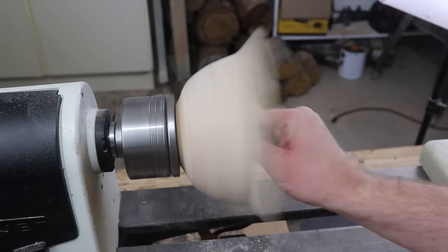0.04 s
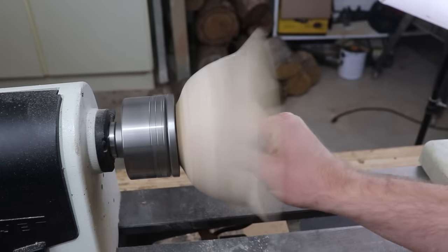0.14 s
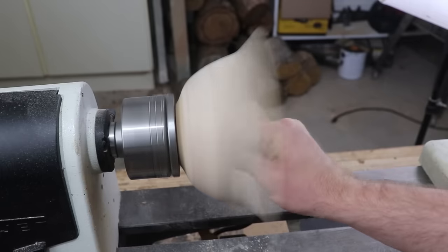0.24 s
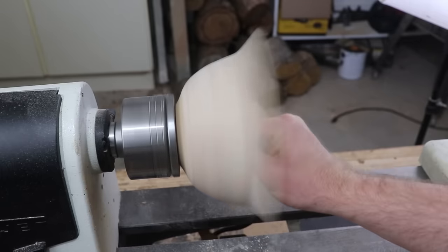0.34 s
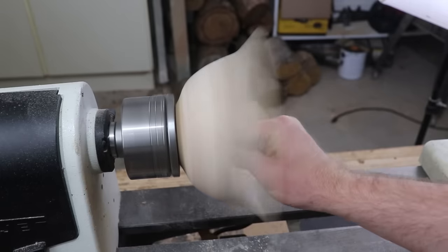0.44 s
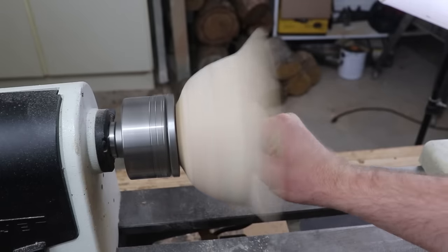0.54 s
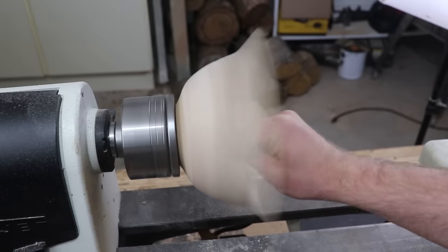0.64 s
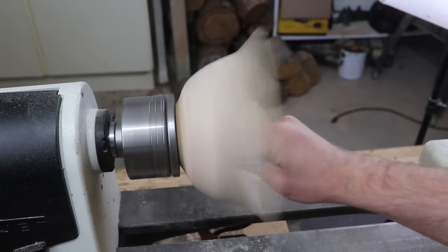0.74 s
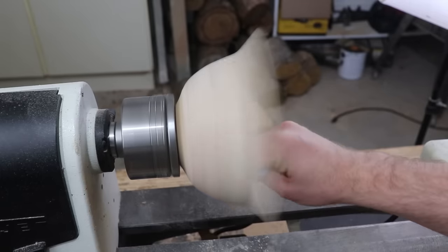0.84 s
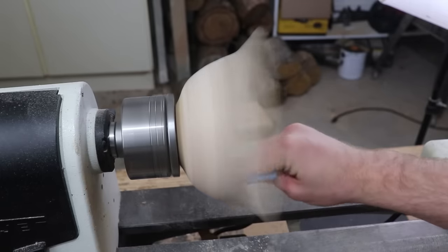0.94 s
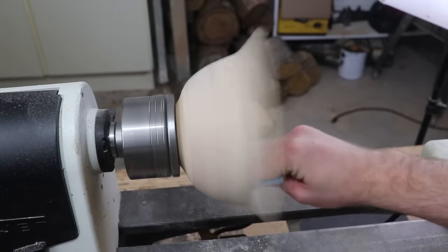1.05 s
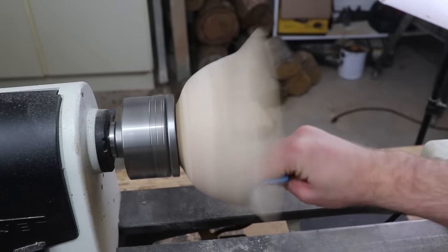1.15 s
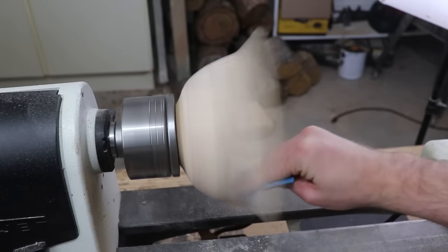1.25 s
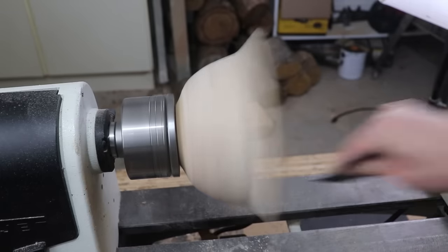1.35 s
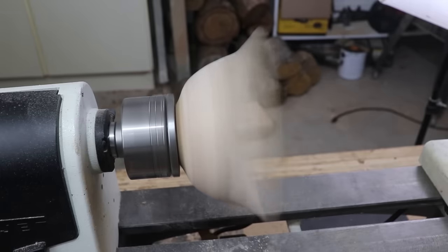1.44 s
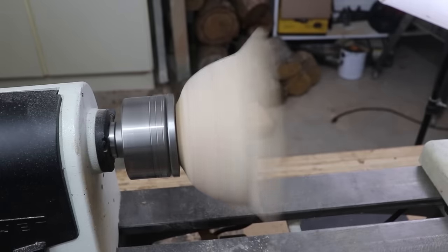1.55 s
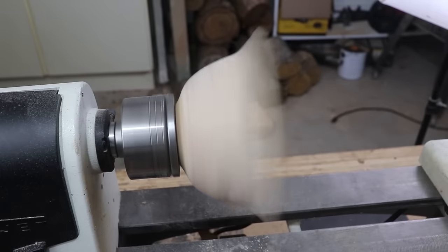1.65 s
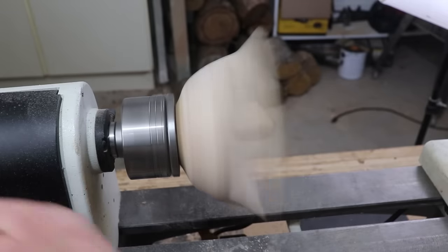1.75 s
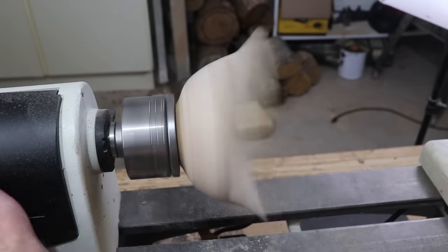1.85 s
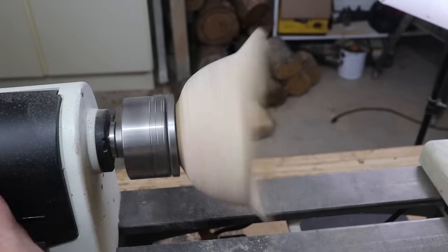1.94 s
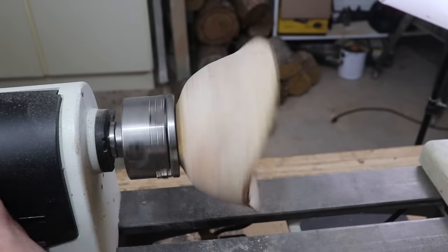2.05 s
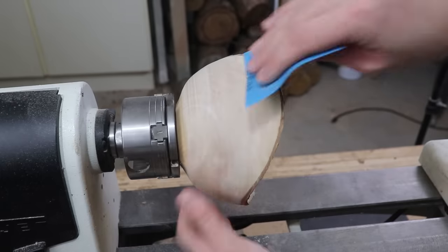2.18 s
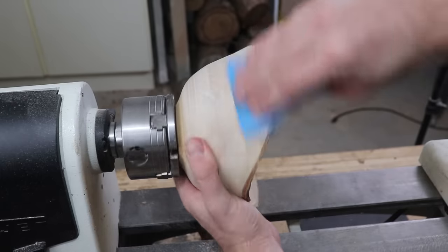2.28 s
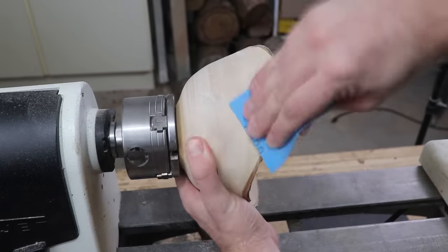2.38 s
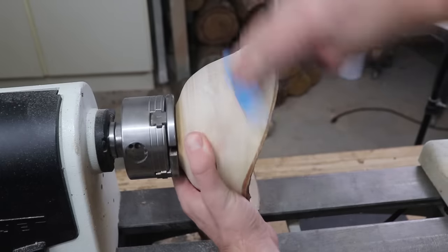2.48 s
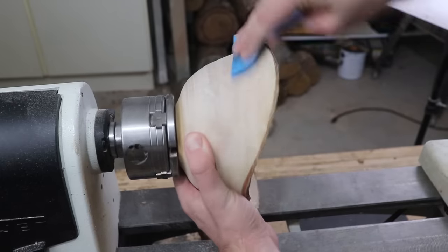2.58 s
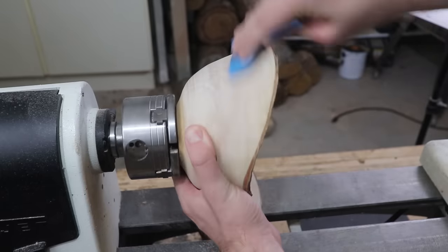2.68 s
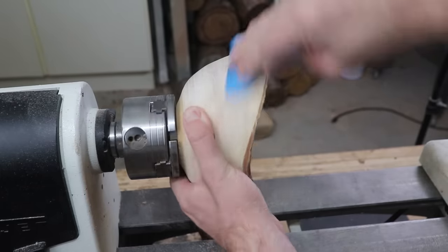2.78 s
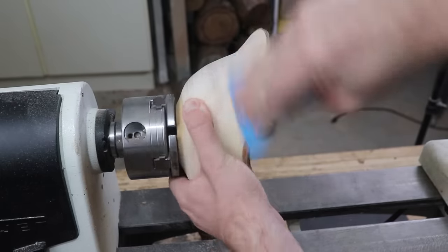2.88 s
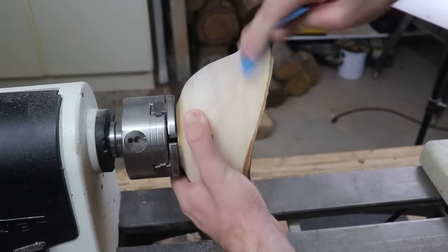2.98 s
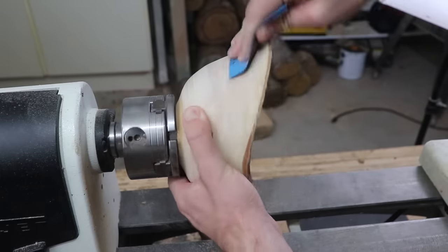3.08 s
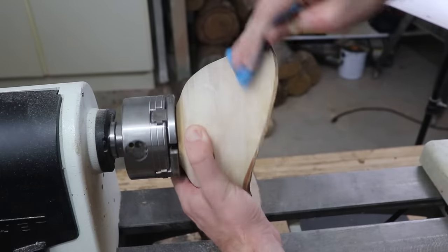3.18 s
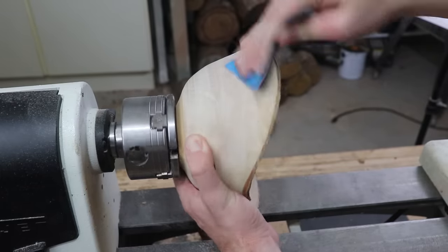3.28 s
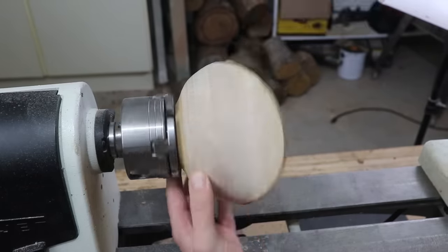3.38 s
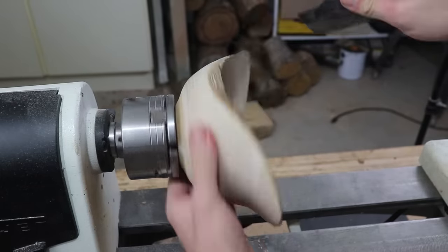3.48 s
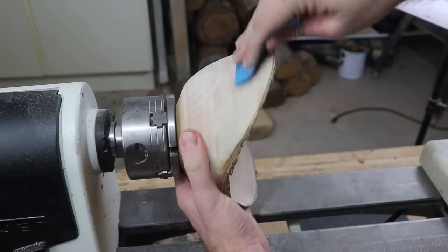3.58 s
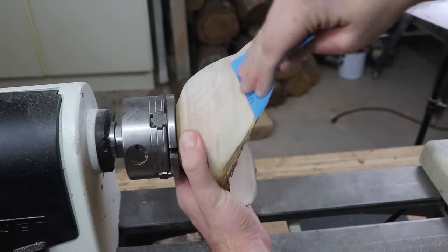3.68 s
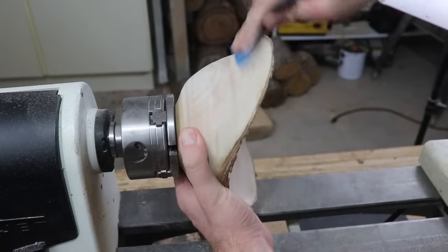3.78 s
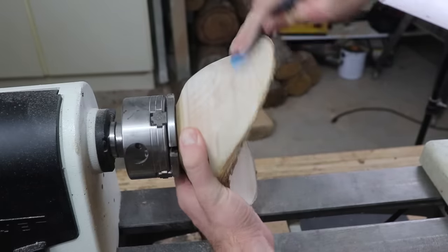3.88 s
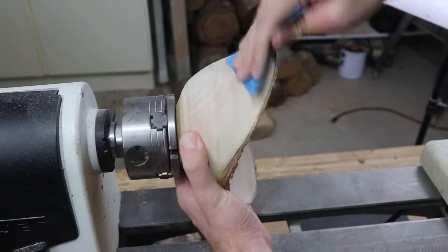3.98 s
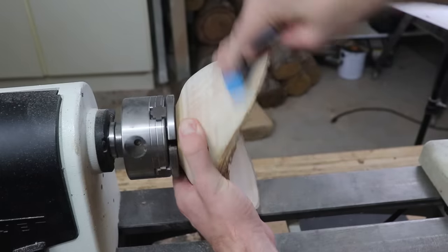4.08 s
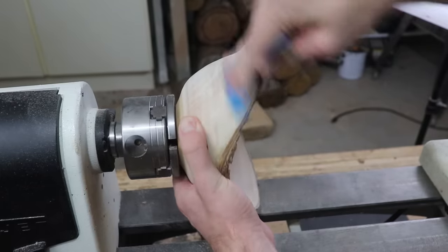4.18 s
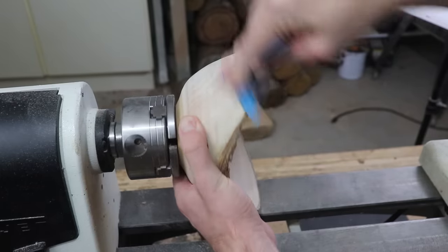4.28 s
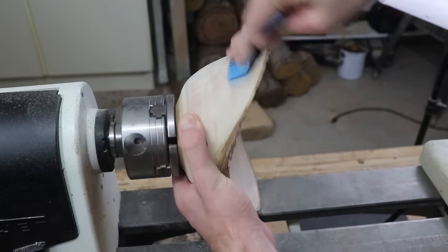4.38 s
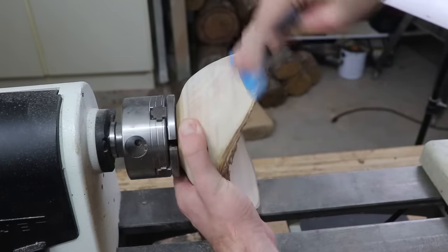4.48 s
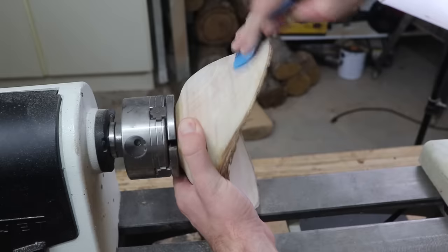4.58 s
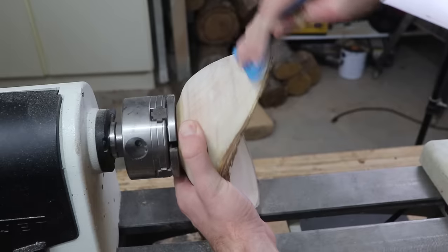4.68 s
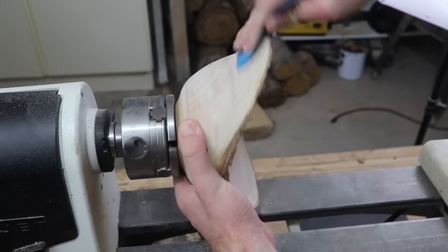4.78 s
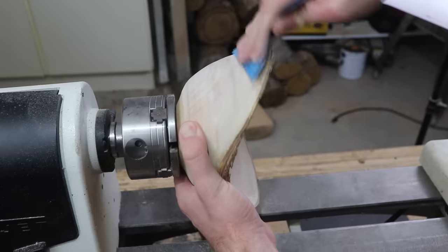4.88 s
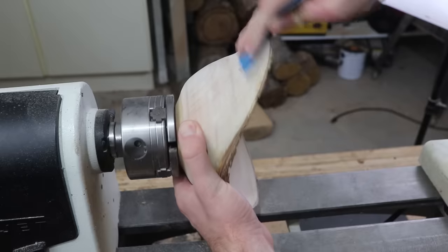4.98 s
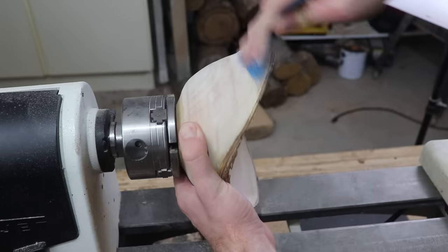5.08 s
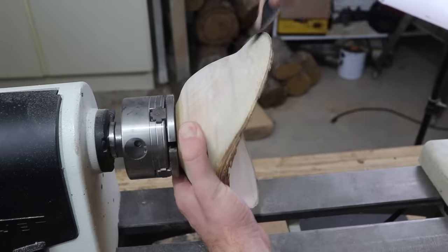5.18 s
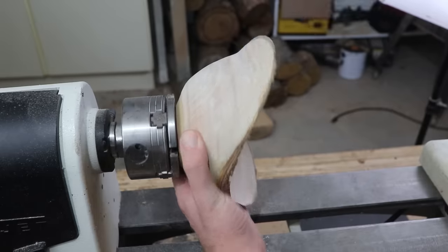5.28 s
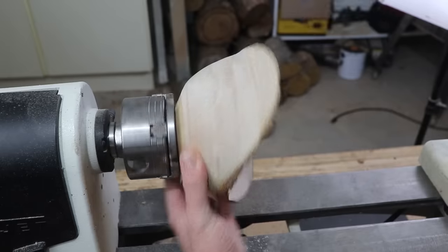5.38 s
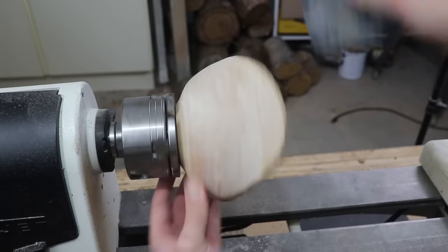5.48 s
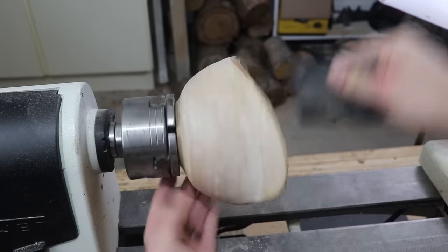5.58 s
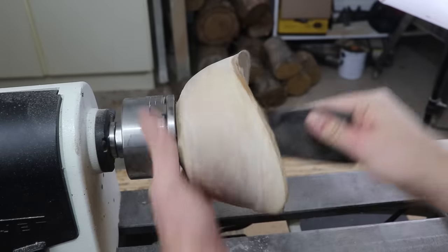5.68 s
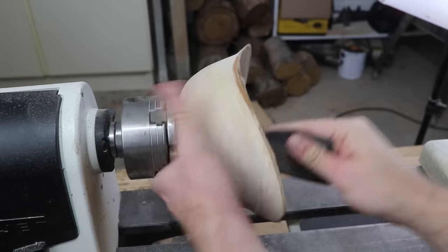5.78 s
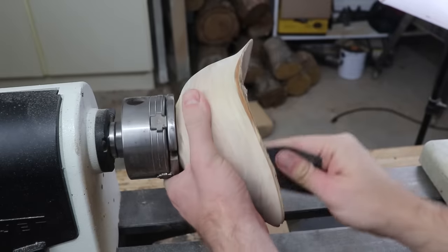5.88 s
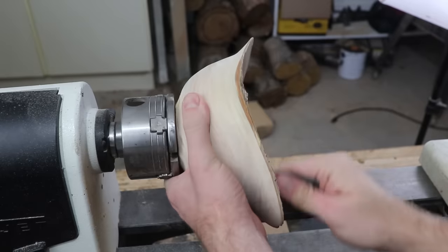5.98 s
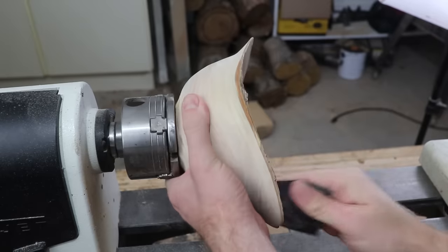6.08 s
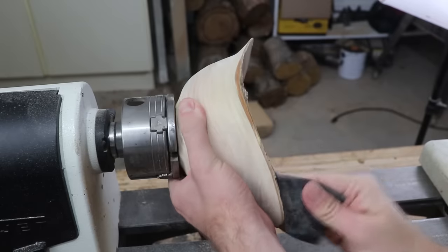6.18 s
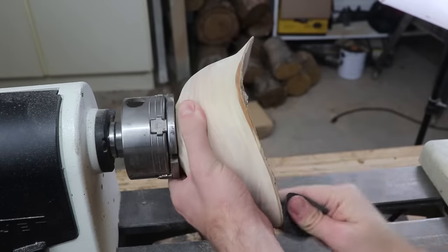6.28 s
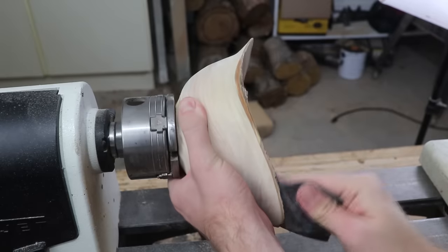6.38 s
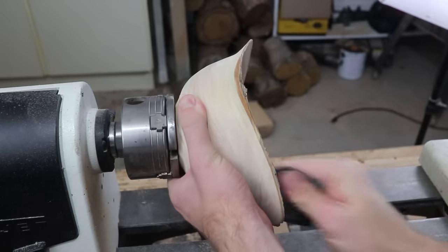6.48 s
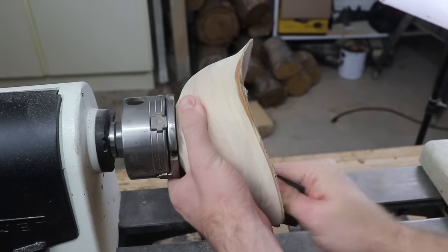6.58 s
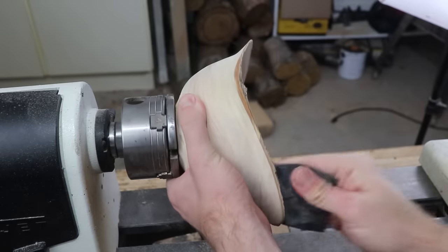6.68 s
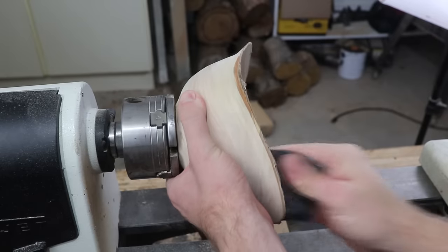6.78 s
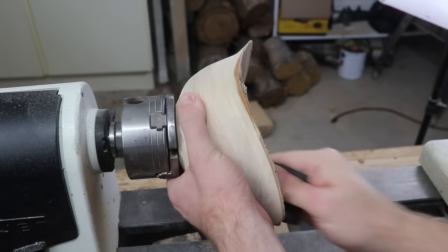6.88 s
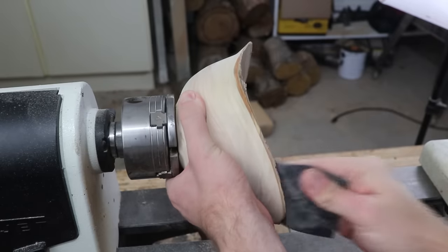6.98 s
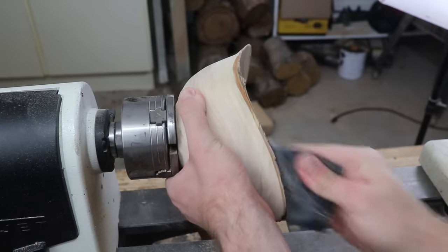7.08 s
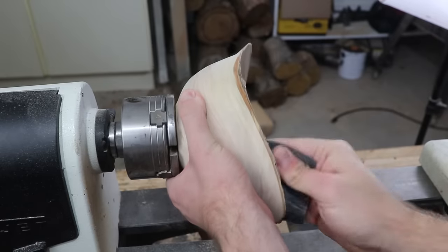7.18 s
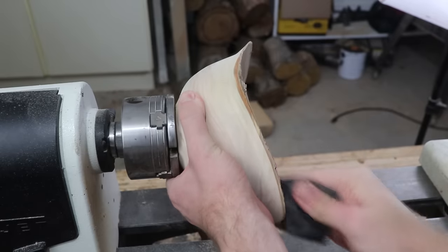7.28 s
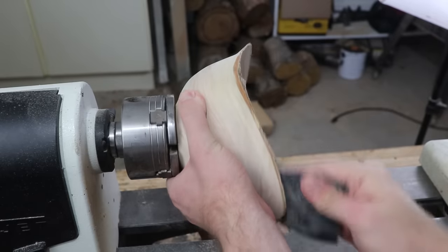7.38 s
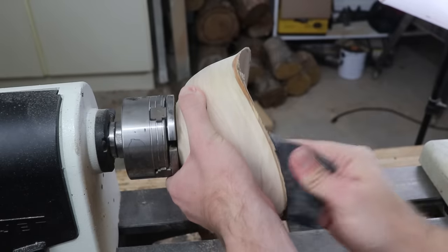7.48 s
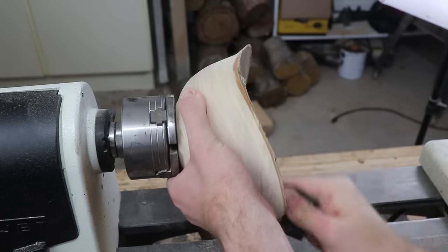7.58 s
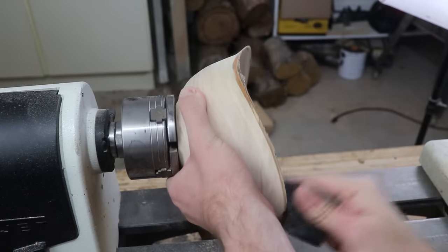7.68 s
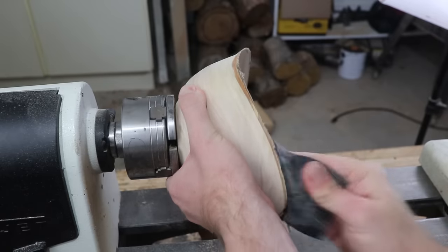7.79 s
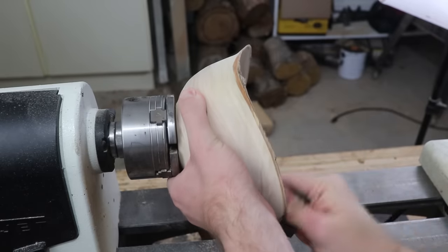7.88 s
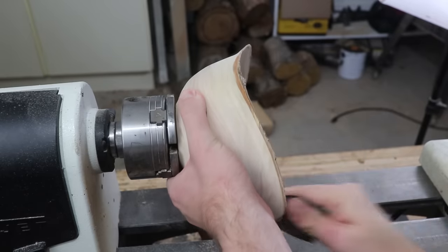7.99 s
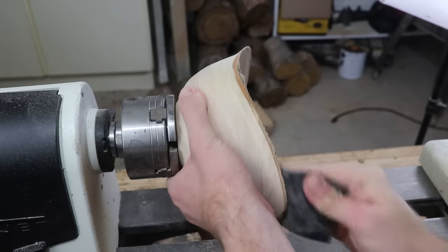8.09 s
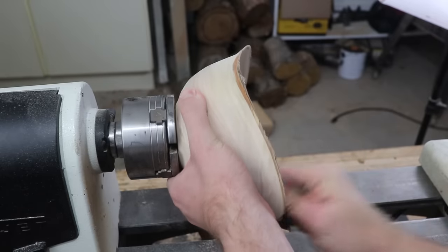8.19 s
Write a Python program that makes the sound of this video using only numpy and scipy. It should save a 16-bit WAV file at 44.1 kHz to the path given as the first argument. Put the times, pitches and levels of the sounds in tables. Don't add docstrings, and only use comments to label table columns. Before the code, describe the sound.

Lathe hum and steady gritty fizz stop with a click and short whirring rundown, followed by rapid, then longer sandpaper rasps on hollow wood.

```python
import sys
import numpy as np
from scipy import signal
from scipy.fft import rfft, irfft
from scipy.io import wavfile
from scipy.ndimage import uniform_filter1d

SR = 44100
rng = np.random.default_rng(int(sys.argv[2]) if len(sys.argv) > 2 else 0)


def voltage_ratio(level):
    return 10 ** (np.asarray(level, float) / 20)


def master_out(mix):
    frames = np.transpose(np.atleast_2d(mix))
    ceiling = np.clip(frames, -1, 1)
    pcm = np.round(ceiling * 32767).astype(np.int16)
    wavfile.write(sys.argv[1], SR, pcm)


N = 363815

# f/Hz, level/dB
FLOOR = [(15, -48), (25, -32), (64, -4.5), (137, -5.5), (276, -6.5), (343, -6.5), (557, -6), (655, -5.5),
         (1220, -8), (1510, -13.5), (3790, -33), (5240, -31.5), (15800, -46)]
# f/Hz, likeness
FLOOR_SAME = [(60, 0.97), (180, 0.96), (550, 0.78), (1650, 0.067), (4970, 0.25), (15000, 0.03)]
# t/s, level/dB
FLOOR_LEVEL = [(1.9, -53.5), (2.45, -51), (4.1, -53.5), (4.2, -51), (5.25, -49.5), (5.4, -53), (6.05, -53),
               (6.5, -49.5), (7.25, -48), (7.35, -52), (8.25, -51)]
WIDE_UNTIL = 4.153
FLOOR_SWAY_DB = .8
# t/s, level/dB
DRONE = [(3.7, -49.5), (4.2, -59), (4.55, -51), (4.88, -58.5), (5.3, -48), (5.75, -55.5), (6.05, -62),
         (6.3, -52.5), (6.5, -59)]
# t/s, level/dB
PASSING = [(6.38, -66), (6.5, -44.5), (6.8, -42.5), (7.0, -43), (7.25, -45.5), (7.33, -60)]
HUM_HZ, DRONE_HZ, PASSING_HZ = 120, 336, 680

# t/s, level/dB
MOTOR = [
    (0, -29.5),
    (.14, -27),
    (.45, -28.5),
    (.7, -32.5),
    (1.36, -33),
    (1.4, -27.5),
    (1.643, -28.5),
]
# t/s, whirr level/dB, frame hum level/dB
COAST = [
    (1.66, -42, -42),
    (1.75, -48.5, -55),
    (1.85, -48, -58),
    (1.93, -51.5, -48.5),
    (2.03, -59, -57),
    (2.09, -67, -61),
    (2.18, -88, -85),
]
# multiple, level at hub/dB, level at rim/dB, right channel late/rad
OVERTONES = [(2, -16, -15.5, 0.91), (3, -13.5, -18, 1.44)]
LINES_HZ = [202, 277, 307, 448, 508, 1047, 1076, 1106, 1195, 398, 985]
# level over hum/dB, waver/Hz
MOTOR_LINES = [(-21, 5.03), (-28.5, 3.7), (-26, 3.6), (-23, 3.26), (-22.5, 3.2), (-19, 4.17), (-17.5, 4.5),
               (-25, 3.8), (-27, 4.2), (-31, 3.6), (-33, 2.8)]
STEADY = [1.4, 1.2, 2.2, 2.7, 4, 2.3, 2.8, 2.1, 2.5, 1.6, 1.6]
LINE_LEAN_DB = [1, 2.5, 7, 4, -4.5, -2, 2.5, 10, -5, -11, -2]
LINE_TURN = 1.34
LOAD_AT_S, LOAD_RISE_S = 0.71, 0.14
# t/s, level/dB
SAGS = [
    (.19, -3),
    (.33, -1.5),
    (.52, -5.5),
    (.93, 3.5),
    (1.38, 0.5),
]
# t/s, level/dB
WHINES = [
    (.61, 13),
    (.78, -2),
    (1.24, 8),
    (1.42, 13),
    (1.52, 0),
    (1.6, -1),
    (.2, 2),
]
SAG_S, WHINE_S, WHINE_HZ = 0.036, 0.058, 1047
# f/Hz, level/dB
WHIRR = [(88, -18), (150, -13), (172, -14), (447, -14), (902, -21.5), (1050, -19), (1360, -19.5),
         (2440, -21), (10900, -46), (15800, -49)]
# f/Hz, width/Hz, level/dB
BEARINGS = [(990, 120, -4), (2416, 46, 8), (3400, 99, -8), (5000, 300, -6), (9000, 300, 0),
            (10600, 260, 10.5), (11150, 600, 2), (12200, 350, 6)]
WHIRR_UNDER_DB = -11.5

# t/s, peak level/dB, f/Hz, t60 of the blow/s
SWITCH = [
    (1.64, -27, 2720, 0.006),
    (1.6418, -15, 2640, 0.0036),
    (1.664, -33, 2720, .012),
]
# t/s, peak level/dB, f/Hz, t60/s
SNAPS = [
    (1.367, -20, 3260, 0.052),
    (2.339, -32, 1500, 0.04),
    (2.3425, -17.5, 2160, 0.04),
    (4.158, -19, 2150, 0.025),
    (4.696, -40, 2800, .039),
    (3.972, -30, 2050, 0.06),
    (6.865, -24, 3500, 0.092),
    (7.177, -28, 3000, 0.11),
]
# t/s, peak level/dB, f/Hz, t60/s
CLICKS = [
    (1.6383, -31.5, 5700, 0.049),
    (1.6415, -27, 5700, 0.032),
    (1.663, -44, 3000, 0.053),
    (1.822, -44, 3500, 0.03),
    (1.945, -51.5, 3000, 0.055),
    (2.953, -37, 3300, .05),
    (6.117, -42, 1400, 0.026),
    (6.121, -42, 1600, 0.023),
]
# t/s, peak level/dB, f/Hz, t60/s
TAPS = [
    (1.319, -24.5, 3400, 0.033),
    (4.168, -21, 2070, 0.21),
    (4.385, -24.5, 2020, 0.21),
    (5.402, -46, 1610, 0.014),
    (5.903, -36, 1590, .016),
    (6.635, -24, 3820, 0.19),
    (6.94, -28, 3720, 0.11),
    (7.255, -17.5, 4130, 0.057),
    (7.998, -34.5, 850, .06),
]
# t/s, peak level/dB, f/Hz, t60/s
THUDS = [
    (1.648, -27.5, 820, 0.15),
    (1.83, -45, 310, 0.15),
    (2.172, -38, 696, 0.19),
    (2.2, -37, 650, .15),
    (3.4, -39, 700, 0.33),
    (3.44, -38, 700, 0.32),
    (2.961, -41, 304, .25),
    (3.32, -38, 710, 0.72),
    (3.969, -41, 557, 0.073),
]
# t/s, peak level/dB, f/Hz, t60/s
BOOMS = [
    (5.935, -44, 201, 0.33),
]
# t/s, peak level/dB, f/Hz, t60/s
KNUCKLE = [
    (1.82, -27, 337, .01),
]
# t/s, peak level/dB, f/Hz, t60/s
RINGS = [
    (2.175, -51.5, 157, .3),
    (5.93, -49, 201, 0.33),
    (5.615, -48, 930, .06),
    (5.655, -52, 920, .05),
]
# t/s, peak level/dB, f/Hz, t60/s
BED_RING = [
    (3.66, -53, 147, .6),
]
# its table, width over pitch, broad tick over knock/dB
KINDS = [
    (SWITCH, 0.1, -10),
    (SNAPS, 0.4, -3),
    (CLICKS, 0.53, 16.6),
    (TAPS, 0.16, -2.3),
    (THUDS, 0.32, -20),
    (BOOMS, 0.38, -31),
    (BED_RING, 0.019, -41),
    (KNUCKLE, 0.3, -23),
    (RINGS, 0.036, -40),
]
# f/Hz, level/dB
TICK = [(100, -37), (800, 4), (3000, 10), (8000, 1.5), (16000, -16)]

# t/s, pressure level/dB, place (0 hub, 1 rim)
SPIN = [
    (.1, -53, 0.022),
    (.16, -31, 0.16),
    (.3, -31.5, 0.033),
    (.45, -32.5, 0.2),
    (.6, -32, 0.78),
    (1.1, -31.5, 0.94),
    (1.372, -32.5, 1),
    (1.385, -44, 0.97),
    (1.41, -49, 0.97),
]
# t of the turn/s, level at the turn/dB, level in mid stroke/dB
QUICK_FIRST = [(2.25, -61, -39.5), (2.304, -47.5, -32), (2.323, -42, -29), (2.354, -43, -30.4),
               (2.374, -39, -31), (2.398, -39, -31.5), (2.419, -38, -30), (2.441, -40, -31.5),
               (2.462, -34, -31), (2.485, -35, -30.4), (2.506, -36, -30.5), (2.524, -37, -32),
               (2.548, -35, -31.5), (2.569, -39, -30.5), (2.59, -35, -31), (2.612, -38, -30.8),
               (2.633, -39, -32), (2.655, -38, -30.6), (2.677, -35, -32), (2.693, -36, -32.8),
               (2.707, -30, -31.5), (2.731, -41, -30.6), (2.76, -40, -30.5), (2.782, -34, -31.5),
               (2.81, -39, -29.5), (2.83, -37, -30.5), (2.857, -45, -30.9), (2.877, -40, -30.5),
               (2.9, -42, -32), (2.921, -44, -30.5), (2.947, -37, -30), (2.969, -40, -32.5),
               (2.989, -45, -34.0), (3.018, -57, -31.5), (3.05, -35, -30), (3.07, -32, -31),
               (3.085, -32, -31), (3.11, -50, -31), (3.134, -39, -31.5), (3.158, -39, -32.5),
               (3.179, -43, -31.5), (3.202, -35, -31.5), (3.224, -42, -35.5), (3.245, -42, -32.5),
               (3.266, -36, -30), (3.289, -37, -32), (3.309, -35, -31), (3.33, -38, -30),
               (3.348, -37, -31.8), (3.368, -32, -34.2), (3.39, -57, -50.7)]
QUICK_SECOND = [(3.62, -50, -36.5), (3.655, -58, -32.5), (3.675, -40, -31.2), (3.697, -41, -34),
                (3.715, -38, -32.5), (3.737, -37, -32), (3.756, -38, -32), (3.778, -36, -32.5),
                (3.8, -44, -31.6), (3.819, -38, -33), (3.84, -38, -31.2), (3.861, -40, -33),
                (3.882, -36, -31.5), (3.904, -38, -32), (3.926, -36, -31.5), (3.948, -40, -33),
                (3.967, -34, -28.5), (3.992, -41, -31.8), (4.014, -38, -31), (4.037, -46, -33),
                (4.056, -42, -32), (4.079, -41, -30.5), (4.098, -37, -30), (4.122, -39, -26.5),
                (4.14, -40, -34), (4.156, -43, -32)]
# t of the turn/s, turn level/dB, mid level/dB, fizz over rasp/dB, lean/dB
OUTSIDE = [(4.153, -34, -25.5, -10, 1), (4.231, -38.5, -27, -9, -1.7), (4.356, -40, -29.5, -7.5, 1.5),
           (4.471, -40.5, -30.5, -6.5, 1.5), (4.562, -39.5, -30, -6.5, -1.5), (4.673, -42.5, -30, -7, 1.5),
           (4.77, -44, -31, -8.5, -0.5), (4.871, -43, -31, -7, -1), (4.975, -46, -31, -8.5, 1.5),
           (5.065, -42, -30, -8.5, 1), (5.158, -47.5, -31, -8, -3.5), (5.33, -49, -31, 0, 6)]
INSIDE = [(6.137, -49.5, -34, -6.5, 2.5), (6.285, -47, -31.5, -5.5, 0.5), (6.409, -48, -32.5, -4.5, 0.5),
          (6.534, -38, -33, -5, 4), (6.619, -38, -33.5, -5, -4.5), (6.694, -41, -29.5, -4, -1.5),
          (6.847, -46, -34, -0.5, -1), (6.913, -45, -30, -6.5, -2), (6.976, -35.5, -28.5, -2, 1.5),
          (7.161, -45.5, -29, -2, -2.5), (7.302, -33.5, -30, -2, 1.5), (7.459, -40, -30.5, -2.5, 0.5),
          (7.621, -32, -30, -1, -2.5), (7.743, -35.5, -30, -0.5, 2), (7.874, -35, -31, -1.5, 1),
          (8.041, -34, -32, -1.5, -1), (8.27, -31, -30, 0, 0)]
# t/s, length/s, level/dB
BRUSH = [(2.161, 0.028, -53), (3.376, 0.017, -51), (3.405, 0.017, -50.5), (3.45, .03, -70),
         (3.499, 0.02, -56), (3.53, 0.025, -58), (3.57, 0.02, -55), (3.58, 0.049, -61),
         (5.298, 0.17, -54.5), (5.318, .05, -56), (5.422, 0.19, -67.5), (5.555, 0.11, -58.5),
         (5.624, 0.085, -69), (5.683, 0.092, -65), (5.787, 0.14, -59.5), (5.911, 0.096, -50),
         (5.973, 0.16, -72), (6.08, 0.018, -58), (6.093, 0.023, -56), (6.108, 0.025, -53)]
# f/Hz, level/dB
SPIN_TONE = [(350, -29), (600, -15.5), (930, -11), (1070, -9.5), (1160, -16), (1310, -16), (2600, -7),
             (3860, -5), (8670, -6), (13600, -14.5), (15800, -18)]
# f/Hz, level/dB
OUT_TONE = [(590, -19), (1000, -11), (1350, -15), (1520, -6), (1780, -8), (2000, -5.5), (2220, -7.5),
            (2670, -0.5), (8010, 1.5), (13300, -3.5), (15800, -8.5)]
# f/Hz, level/dB
IN_TONE = [(590, -34), (1000, -15), (1300, -14), (1480, -5), (2070, -6.5), (2250, -2.5), (4000, -0.5),
           (4710, -2.5), (7220, -4), (12900, -14.5), (15800, -19)]
# f/Hz, level/dB
BRUSH_TONE = [(880, -34), (1500, -1), (1860, -7), (2250, -18), (2660, -5), (4660, -8.5), (12300, -21),
              (15800, -31)]
# f/Hz, width/Hz, level/dB
OUT_WALL = [(1506, 99, 1), (2060, 66, -34.5), (4070, 120, -11)]
# f/Hz, width/Hz, level/dB
IN_WALL = [(1470, 240, -6), (2400, 180, -38), (3300, 190, -7.5), (4120, 350, -14)]
# f/Hz, left minus right level/dB
RUB_BALANCE = [(60, -6), (290, 1), (1400, -1), (3100, -3.5), (6800, -1.5), (15000, -6.5)]
SPIN_SAME, QUICK_SAME, OUT_SAME, IN_SAME = 0.017, 0.019, 0.56, 0.6
SPIN_FULL_DB, HUB_BODY_DB, RIM_BODY_DB = -32.5, -23, -5
SLACK_FIZZ, SLACK_BODY = 0.55, .4
FLUTTER_PER_S, FLUTTER_DB = 110, 0.9
BODY_PER_FIZZ = 0.77
FIRST_LEAN_DB, LAST_LEAN_DB = 7, -6
# t/s, fizz level/dB
SLIPS = [
    (.52, -1.5),
    (2.25, -11),
    (2.32, -2.5),
    (2.96, -3),
    (3.98, -2),
    (4.15, -6),
]
# t/s, level/dB
STOPS = [
    (3.4, -20),
    (3.2, -3.5),
    (2.76, -0.5),
    (3.6, 10.5),
    (3.087, 0),
]
# t/s, level/dB
HANGS = [(4.252, -3.5), (4.38, -3), (4.49, -4), (4.69, -4), (4.785, -1), (6.28, 3), (6.41, 2), (7.875, -9),
         (6.685, -7), (6.86, -10), (7.15, -1), (7.17, -2), (7.302, -7), (7.47, -4), (7.62, 0), (4.392, 3.5),
         (4.703, 3), (5.17, 1), (6.63, -2), (6.975, -13), (5.06, -1), (4.345, -4)]
SLIP_S, STOP_S, HANG_S = 0.037, 0.0085, 0.0092
# t/s, length/s, f/Hz, level/dB
SINGS = [(0.505, 0.055, 2350, 10), (.55, 0.12, 1600, 3.5), (0.444, 0.027, 3400, 3.5),
         (0.252, 0.044, 3100, -5), (.33, .04, 4200, 2), (7.042, 0.036, 3500, -2.5),
         (6.33, 0.037, 9000, 5.5), (6.222, .05, 10000, 6), (8.1, .08, 10000, 2), (.76, 0.076, 4100, -3.5),
         (1.25, .1, 5800, -3), (1.32, 0.068, 3300, 1.5), (2.291, 0.011, 4000, 11), (2.46, 0.14, 3830, -2.5),
         (2.447, .1, 8200, 2.5), (3.331, 0.064, 5000, -3.5), (0.674, .04, 3300, 2.5), (0.944, .08, 2750, 5),
         (1.2, .1, 2180, -0.5), (6.175, .05, 3720, 6), (6.33, .03, 4200, 2), (6.457, 0.028, 4300, 3.5),
         (6.46, 0.059, 3100, 4), (6.596, .03, 4000, -1), (6.66, 0.016, 3700, 5), (6.73, .03, 3900, 1.5),
         (6.952, 0.012, 3600, 1), (7.017, 0.037, 3200, 5), (7.094, 0.035, 4180, -3),
         (7.272, 0.051, 2380, 9), (7.333, .03, 3600, 5.5), (7.397, .04, 3700, -2),
         (7.527, 0.067, 3200, 3.5), (7.663, .03, 4200, 4), (7.8, .05, 4020, 1), (7.99, 0.055, 3770, 7),
         (8.155, 0.045, 3500, 5.5)]
SING_OCTAVES = 0.35


def evened(x):
    return x / np.sqrt(np.mean(x ** 2) + 1e-20)


def read(points, hz):
    f, value = np.transpose(points)
    return np.interp(np.log(hz + 1), np.log(f + 1), value)


def follow(rows):
    s, *columns = np.transpose(rows)
    t = np.arange(s[0], min(s[-1], N / SR), 1 / SR)
    return t, *(np.interp(t, s, c) for c in columns)


def dents(t, rows, width_s):
    return sum(db * np.exp(-((t - s) / width_s) ** 2) for s, db in rows)


def add(mix, s, sound):
    part = mix[:, round(s * SR):][:, :sound.shape[-1]]
    part += sound[..., :part.shape[1]]


def drift(size, hz):
    knots = rng.standard_normal(int(N / SR * 2000))[:int(size / SR * hz * 2) + 3]
    span = max(int(SR / hz / 2), 1)
    return evened(uniform_filter1d(np.repeat(knots, span + 1), span)[:size])


def colour(x, tone, modes=()):
    hz = np.fft.rfftfreq(x.shape[-1], 1 / SR)
    rings = sum(voltage_ratio(db) / (1 + 2j * (hz - f) / width) for f, width, db in modes)
    gain = voltage_ratio(read(tone, hz)) * (1 + rings)
    response = evened(abs(gain)) * np.exp(1j * np.angle(gain))
    return irfft(rfft(x) * response, x.shape[-1])


def pair(draw, same):
    same = np.clip(same, 0, 1)
    return np.array([draw[0], same * draw[0] + np.sqrt(1 - same ** 2) * draw[1]])


def fuzz(hz, width, steady=1.23, turn=0):
    wobble = drift(len(hz), width) + 1j * drift(len(hz), width)
    carrier = np.exp(2j * np.pi * np.cumsum(hz) / SR - 1j * turn)
    return evened((carrier * (steady + wobble)).real)


def floor_noise():
    hz, t = np.fft.rfftfreq(N, 1 / SR), np.arange(N) / SR
    apart = rng.standard_normal((2, N))
    alike = irfft(pair(rfft(apart), read(FLOOR_SAME, hz)), N)
    noise = colour(np.where(t < WIDE_UNTIL, apart, alike), FLOOR)
    level_db = np.interp(t, *np.transpose(FLOOR_LEVEL)) + 3.5
    return noise * voltage_ratio(level_db + FLOOR_SWAY_DB * drift(N, 8.3))


def far_drone():
    t, db = follow(DRONE)
    hz = DRONE_HZ + 0.61 * drift(len(t), 2.82)
    return voltage_ratio(db + 1.5) * np.sin(2 * np.pi * np.cumsum(hz) / SR) * signal.windows.tukey(len(t), .1)


def passing_wash():
    t, db = follow(PASSING)
    swell = pair([drift(len(t), 170), drift(len(t), 170)], 0.36)
    side_db = np.array([[1.1], [4]])
    return voltage_ratio(db + side_db) * swell * np.cos(2 * np.pi * PASSING_HZ * t + [[0], [1.3]])


def background():
    out = floor_noise()
    add(out, DRONE[0][0], far_drone())
    add(out, PASSING[0][0], passing_wash())
    return out


def whirr(db):
    return voltage_ratio(db) * colour(pair(rng.standard_normal((2, len(db))), 0.032), WHIRR, BEARINGS)


def motor():
    t, hum_db = follow(MOTOR)
    hum_db = hum_db + dents(t, SAGS, SAG_S)
    load = .5 + .5 * np.tanh((t - LOAD_AT_S) / LOAD_RISE_S)
    tones = np.sqrt(2) * np.cos(2 * np.pi * HUM_HZ * t + [[0], [.28]])
    for k, hub_db, rim_db, late in OVERTONES:
        phase = 2 * np.pi * k * HUM_HZ * t - late * np.array([[0], [1]])
        tones = tones + voltage_ratio(hub_db + (rim_db - hub_db) * load) * np.cos(phase)
    whine_db = dents(t, WHINES, WHINE_S)
    for f, (db, waver), firm, lean_db in zip(LINES_HZ, MOTOR_LINES, STEADY, LINE_LEAN_DB):
        is_whine = abs(f / WHINE_HZ - 1) < .015
        line_db = db + lean_db * (load - .5) + whine_db * is_whine
        hz = np.full(len(t), float(f))
        line = pair([fuzz(hz, waver, firm), fuzz(hz, waver, firm, LINE_TURN)], 120 / f)
        tones = tones + voltage_ratio(line_db) * line
    off = np.clip((t[-1] - t) / 0.0024, 0, 1)
    return voltage_ratio(hum_db) * tones * off + whirr(hum_db + WHIRR_UNDER_DB)


def coasting():
    t, whirr_db, frame_db = follow([(MOTOR[-1][0], *COAST[0][1:])] + COAST)
    hz = np.full(len(t), 203.0)
    frame = pair([fuzz(hz, 8, 1.5), fuzz(hz, 8, 1.5, 1.3)], 0.23)
    return whirr(whirr_db + 6.0) + voltage_ratio(frame_db + 1.0) * frame


def lathe():
    out = np.zeros((2, N))
    add(out, 0, motor())
    add(out, MOTOR[-1][0], coasting())
    return out


def knocks():
    out, t = np.zeros((2, N)), np.arange(SR // 2) / SR
    for rows, share, tick_db in KINDS:
        for s, db, hz, t60 in rows:
            noise = pair(rng.standard_normal((2, len(t))), 0.67)
            blow = noise * np.clip(t / 0.00084, 0, 1) * voltage_ratio(-60 * t / t60)
            blow = blow + 3 * np.exp(-4 * hz * t)
            ring = t * np.exp(-1.6 * np.pi * share * hz * t) * np.sin(2 * np.pi * hz * t)
            knock = signal.fftconvolve(blow, ring[None], axes=1)[:, :len(t)]
            tick = np.roll(colour(blow, TICK), 40, axis=1) * (t < .2)
            add(out, s, voltage_ratio(db) * (knock / abs(knock).max() + voltage_ratio(tick_db) * tick / abs(tick).max()))
    return out


def grit(rub_db, fizz_db, body_db, tone, modes, same, grain_db, catch_db):
    size = len(rub_db) + 1024
    rub_db = np.pad(rub_db, (0, 1024), constant_values=-120)
    fizz_db, body_db = (np.pad(db, (0, 1024), "mean") for db in (fizz_db, body_db))
    catches = voltage_ratio(1.5 * np.minimum(rng.exponential(1, size), 3.)) * (rng.random(size) < 400 / SR)
    catches = signal.lfilter([1], [1, -.9], catches)
    cutting = pair(rng.standard_normal((2, size)), same)
    cutting = evened(cutting * voltage_ratio(grain_db * drift(size, 300)) * (1 + voltage_ratio(catch_db) * catches))
    hz = np.fft.rfftfreq(size, 1 / SR)
    low, high = 1 / (1 + (hz / 2400) ** 8), 1 / (1 + (6500 / (hz + 1)) ** 4)
    fizz_db, body_db = fizz_db - fizz_db.mean(), body_db - body_db.mean()
    layers = [(low, body_db - 1.2 * fizz_db), (1 - low - high, -.4 * fizz_db), (high, 1.22 * fizz_db)]
    side = voltage_ratio(read(RUB_BALANCE, hz) * np.array([[.5], [-.5]]))
    sound = sum(rfft(cutting * voltage_ratio(rub_db + db)) * band for band, db in layers) * side
    return colour(irfft(sound, size), tone, modes)


def strokes(rows, flat, slow_fizz_db, stop_db=0):
    rows = np.array(rows)
    t, turn_db = follow(rows[:, :2])
    turn_db = turn_db + stop_db
    k = np.clip(np.searchsorted(rows[:, 0], t, "right") - 1, 0, len(rows) - 2)
    along = np.clip((t - rows[k, 0]) / np.diff(rows[:, 0])[k], 0, 1)
    lean_db = rows[k, 4]
    early = along ** voltage_ratio(np.clip(.4 * lean_db - .5, -2, 2))
    speed = np.tanh(flat * np.sin(np.pi * early) ** 2) / np.tanh(flat)
    top_db = rows[k, 2] + 2 * lean_db * (along - .5)
    stroke_fizz_db = uniform_filter1d(rows[k, 3], size=200)
    rub_db = turn_db + (top_db - turn_db) * speed
    return t, rub_db, stroke_fizz_db + slow_fizz_db * (1 - speed), BODY_PER_FIZZ * stroke_fizz_db


def quick(rows):
    k = np.arange(len(rows))
    lean_db = FIRST_LEAN_DB * (k == 0) + LAST_LEAN_DB * (k == len(rows) - 2)
    return np.column_stack([rows, 0 * k, lean_db])


def brushing(length, db):
    touch = np.sin(np.pi * np.linspace(0, 1, 2 * round(length * SR / 2)) ** 0.61)
    level_db = db + 3.5 - 18 * (1 - touch)
    return grit(level_db, 0 * touch, 0 * touch, BRUSH_TONE, (), 0.16, 1.1, -15)


def spin_rub():
    t, rub_db, place = follow(SPIN)
    slack_db = SPIN_FULL_DB - rub_db
    body_db = HUB_BODY_DB + (RIM_BODY_DB - HUB_BODY_DB) * place + SLACK_BODY * slack_db
    fizz_db = SLACK_FIZZ * slack_db * (1 - 2 * place) + dents(t, SLIPS, SLIP_S)
    flutter = np.sin(2 * np.pi * FLUTTER_PER_S * t + 0.93 * drift(len(t), 4))
    rub_db = rub_db + FLUTTER_DB * flutter
    return voltage_ratio(3.0) * grit(rub_db, fizz_db, body_db, SPIN_TONE, (), SPIN_SAME, grain_db=0.8, catch_db=-15)


def quick_rub(rows):
    t, rub_db, fizz_db, body_db = strokes(quick(rows), 1.96, -4.5, stop_db=1.0)
    rub_db = rub_db + dents(t, STOPS, STOP_S)
    fizz_db = fizz_db + dents(t, SLIPS, SLIP_S)
    return voltage_ratio(3.0) * grit(rub_db, fizz_db, body_db, OUT_TONE, OUT_WALL, QUICK_SAME, 0.74, -30)


def outside_rub():
    t, rub_db, *controls = strokes(OUTSIDE, 3.3, -6.5)
    rub_db = rub_db + dents(t, HANGS, HANG_S)
    return voltage_ratio(0.4) * grit(rub_db, *controls, OUT_TONE, OUT_WALL, OUT_SAME, 0.64, -31)


def inside_rub():
    t, rub_db, *controls = strokes(INSIDE, 2.4, -4)
    rub_db = rub_db + dents(t, HANGS, HANG_S)
    return voltage_ratio(0.98) * grit(rub_db, *controls, IN_TONE, IN_WALL, IN_SAME, 0.46, -9.0)


def wood_patches(rub):
    z = signal.stft(rub, nperseg=512, noverlap=384)[2]
    fine, long = rng.standard_normal((*z.shape[:0:-1], 2)).T
    fine = evened(uniform_filter1d(uniform_filter1d(fine, size=6, axis=0), size=10, axis=1))
    long = evened(uniform_filter1d(uniform_filter1d(long, size=3, axis=0), size=30, axis=1))
    hz = np.fft.rfftfreq(512, 1 / SR)[:, None] + 1
    t = np.arange(z.shape[-1]) * 128 / SR
    sing_db = sum(db * np.exp(-((t - s) / length) ** 2 - (np.log2(hz / f) / SING_OCTAVES) ** 2)
                  for s, length, f, db in SINGS)
    patched = z * voltage_ratio(1.15 * fine + 1.0 * long + sing_db)
    return signal.istft(patched, nperseg=512, noverlap=384)[1][:, :N]


def sanding():
    out = np.zeros((2, N))
    add(out, SPIN[0][0], spin_rub())
    for rows in QUICK_FIRST, QUICK_SECOND:
        add(out, rows[0][0], quick_rub(rows))
    add(out, OUTSIDE[0][0], outside_rub())
    add(out, INSIDE[0][0], inside_rub())
    for s, length, db in BRUSH:
        add(out, s, brushing(length, db))
    return wood_patches(out)


def workshop(x):
    t = np.arange(SR // 3) / SR
    taps = rng.choice([-1., 1.], (2, len(t))) * (rng.random((2, len(t))) < 3000 / SR) * (t > .004)
    hz, s, z = signal.stft(taps, SR, nperseg=256)
    t60 = read([(200, 0.21), (2000, 0.077), (8000, 0.028), (16000, 0.038)], hz)[:, None]
    tail = signal.istft(z * voltage_ratio(-60 * s / t60), SR, nperseg=256)[1]
    return signal.oaconvolve(x, tail / np.linalg.norm(tail[0]), axes=1)[:, :N]


def scene():
    rub, hits = sanding(), knocks()
    room = workshop(voltage_ratio(-15.5) * rub + voltage_ratio(-11.0) * hits)
    return background() + lathe() + hits + rub + room


def top_cut(x):
    return signal.sosfilt(signal.butter(12, 15990, fs=SR, output="sos"), x)


def record(dry):
    edge = signal.firwin(255, 16000, window=("kaiser", 8), fs=SR)
    mix = signal.oaconvolve(dry, edge[None], "same", axes=1)
    return top_cut(mix)


dry = scene()
out = record(dry)
master_out(out)
```